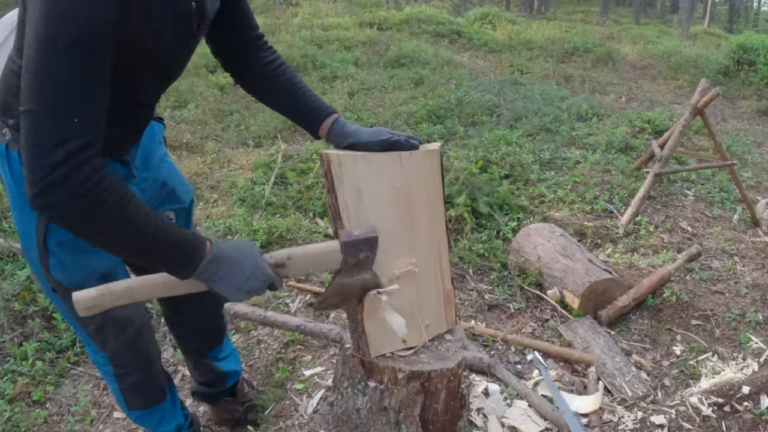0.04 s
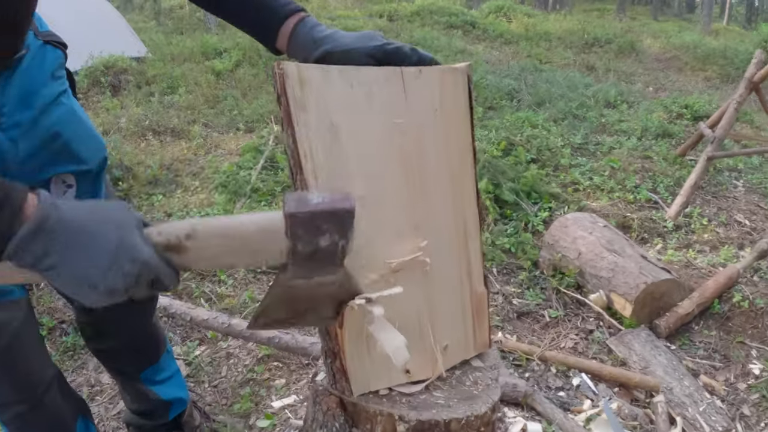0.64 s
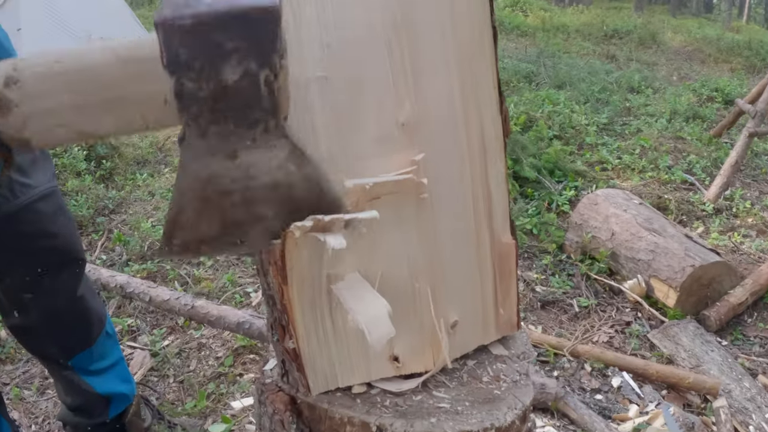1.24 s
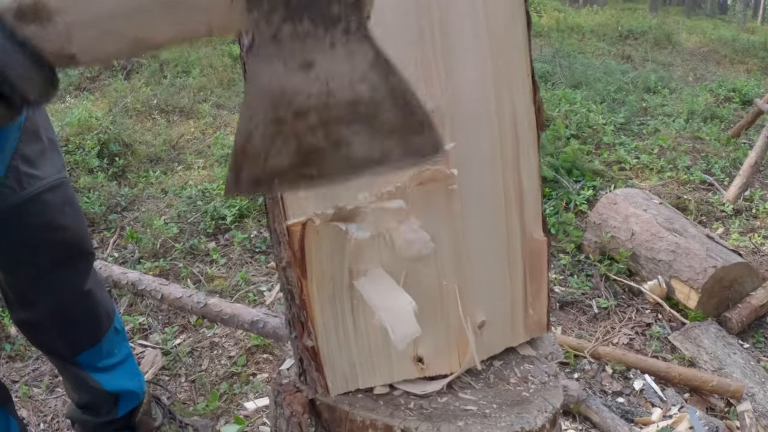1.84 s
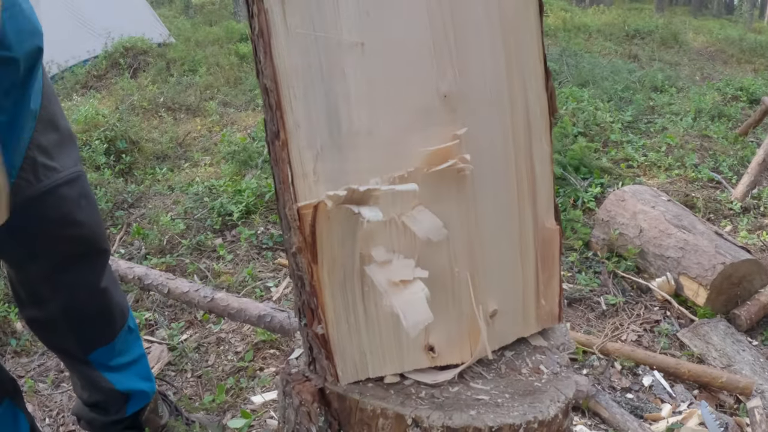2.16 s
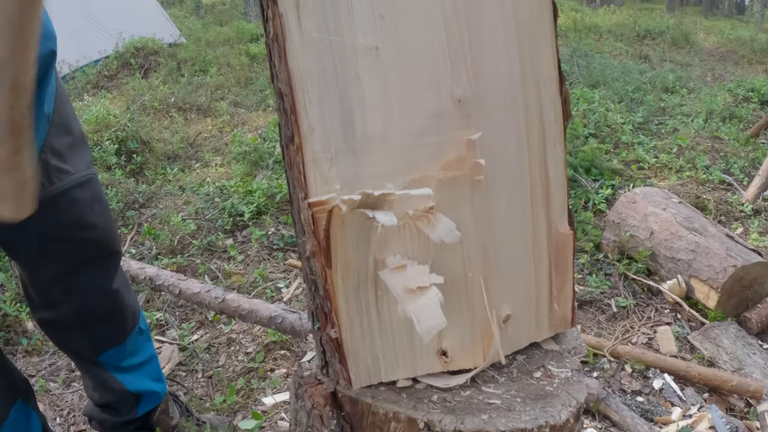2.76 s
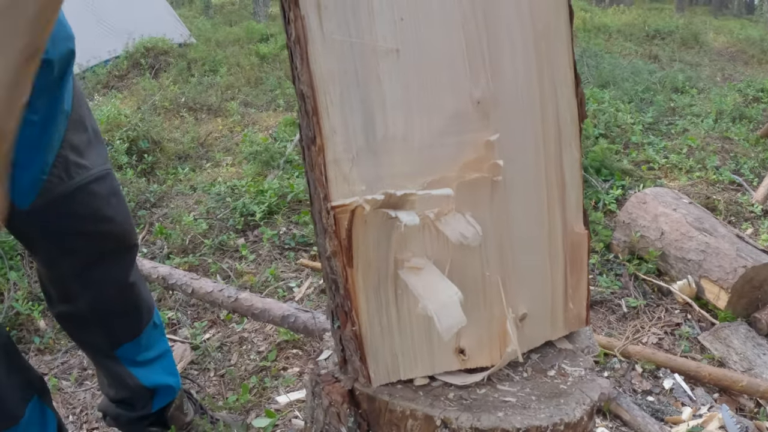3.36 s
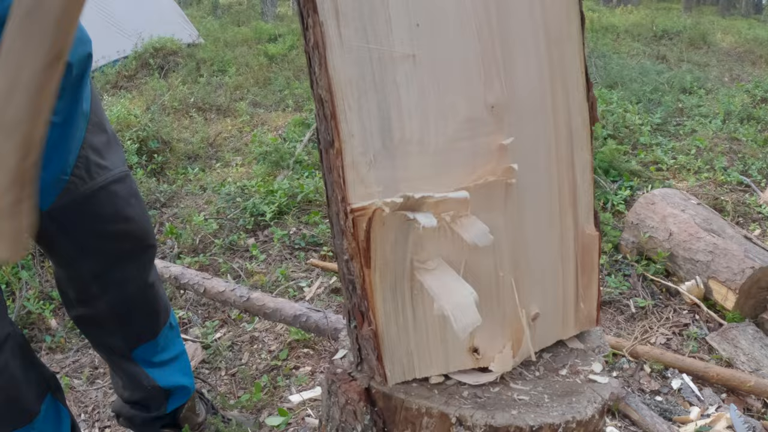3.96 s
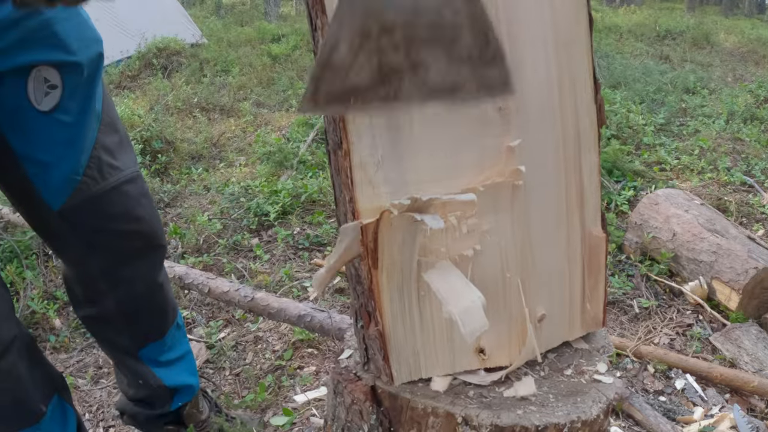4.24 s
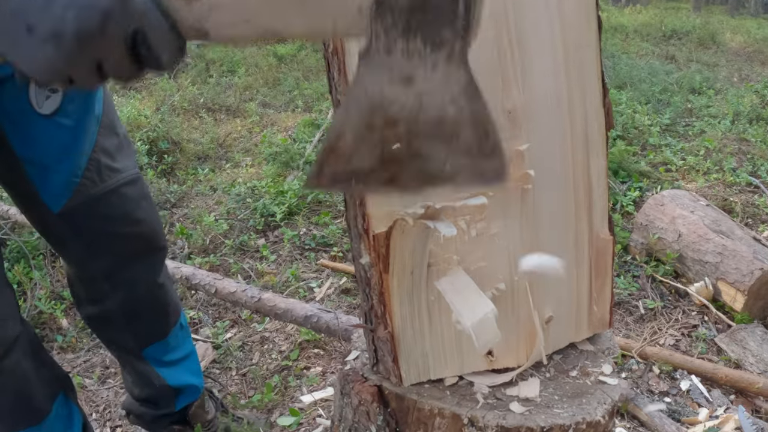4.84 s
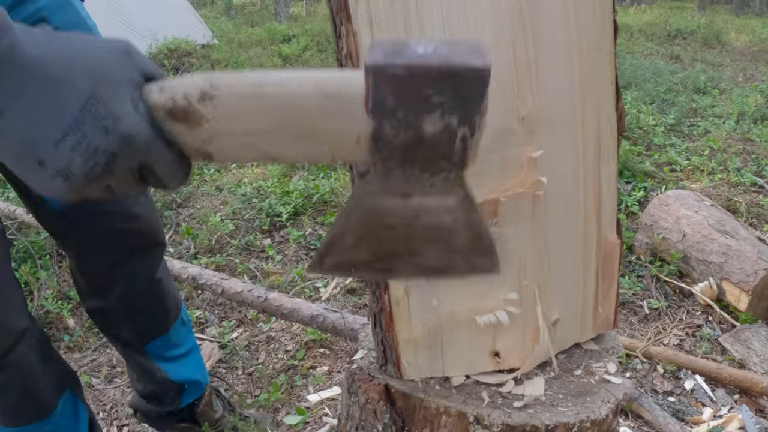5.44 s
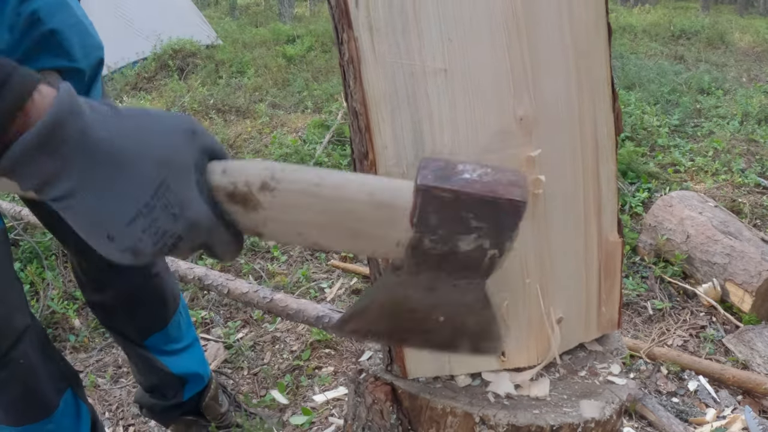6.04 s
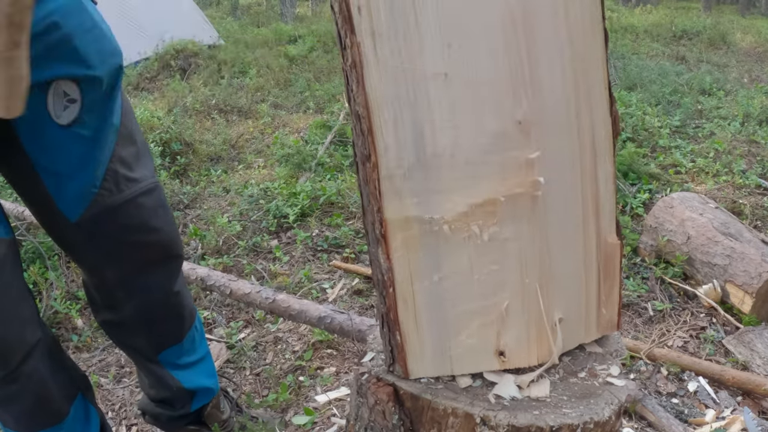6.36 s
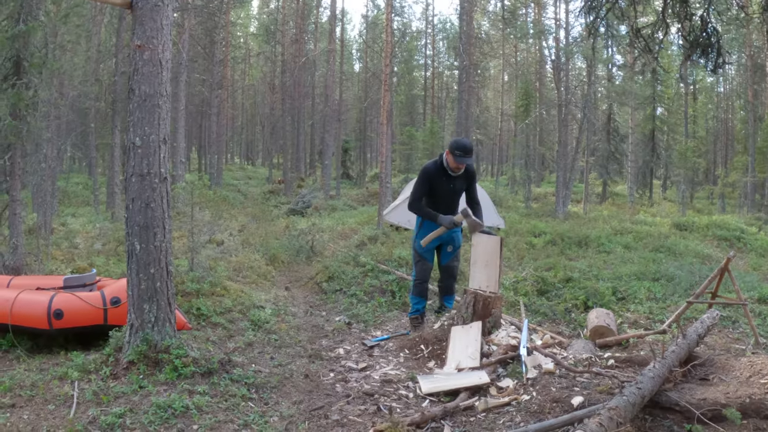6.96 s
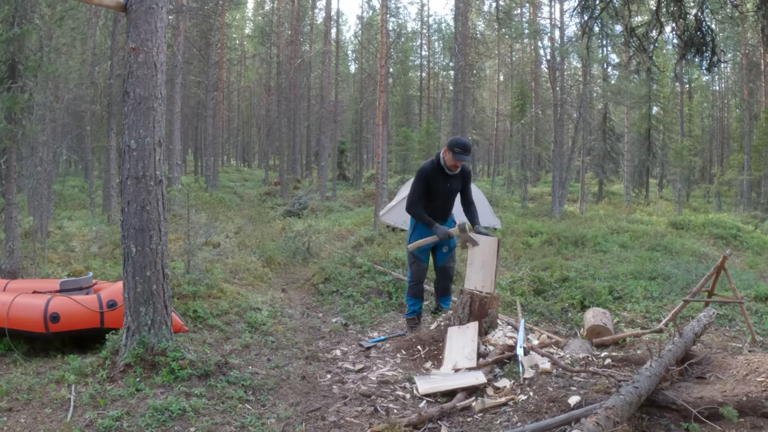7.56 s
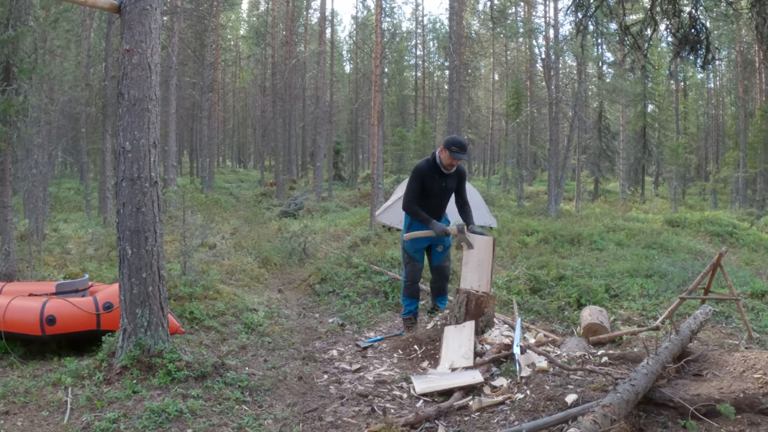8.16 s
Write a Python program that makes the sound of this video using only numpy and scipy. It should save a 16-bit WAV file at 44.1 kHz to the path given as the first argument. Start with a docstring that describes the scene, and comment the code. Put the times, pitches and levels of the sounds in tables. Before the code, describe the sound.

An axe hews a wooden plank on a stump in a quiet forest. After faint rustling and dull microphone handling, the first close chop lands at about 0.6 seconds. Ten more follow steadily, roughly every 0.6 seconds, until 6.7. Each is a sharp woody knock with a crunch of tearing fibres and a slight low thud; the one at 4.1 is mostly a splintering crack. Between strokes, splinters snap, the steel head rings thinly and faintly, clothes rustle and ground litter crackles softly. At 5.6 a split-off slab lands with a short hollow clatter. Around 6.8 the sound dips briefly and the perspective moves farther away. Three hollower chops follow at 7.1, 7.6 and 8.1 seconds, with a short echo among the trunks. A soft forest hush and occasional low puffs of wind on the microphone run underneath.

```python
"""Chopping a plank in a forest

An axe hews a plank on a stump: eleven chops close by, then three from farther off. Each impact excites
the damped modes of plank and stump and tears fibres; pulled free, the steel head rings until the next
chop. Splinters snap, a slab tumbles, and the trunks scatter an echo. Behind the work are the hush of
the forest, crackling litter, rustling clothes, and wind and handling noise at the microphone."""
import sys
import numpy as np
from scipy import signal
from scipy.fft import rfft, irfft
from scipy.io import wavfile
from scipy.ndimage import uniform_filter1d

SR = 44100
rng = np.random.default_rng(int(sys.argv[2]) if len(sys.argv) > 2 else 0)


def dump_mix(stems):
    """Bounce the given channels to the path in sys.argv[1] as a 16-bit WAV at rate SR."""
    frames = np.atleast_2d(stems).T  # one column per channel
    limited = np.clip(frames, -1, 1)  # hard clip at full scale
    pcm = np.round(limited * 32767).astype(np.int16)
    wavfile.write(sys.argv[1], SR, pcm)


N = 362061
TIME, HZ = np.arange(N) / SR, np.fft.rfftfreq(N, 1 / SR)
HIT = np.arange(16384) / SR  # time axis of one impact [s]
HIT_HZ = np.fft.rfftfreq(len(HIT), 1 / SR)
FAR_FROM_S = 6.8  # from here on the work is heard from farther off
NEAR = TIME < FAR_FROM_S


def amp(db):
    """Amplitude ratio: a factor of ten per 20 dB."""
    return 10 ** (np.asarray(db) / 20)

def unit_rms(x):
    """Normalisation to an rms of 1."""
    return x / np.sqrt(np.mean(x ** 2) + 1e-20)

def burst(x, db):
    """Equal energy: the transient carries as much as 20 ms of steady sound at this level."""
    return amp(db) * x / np.sqrt(np.sum(x ** 2) / (SR / 50) + 1e-20)

def read(points, hz):
    """Interpolation on a logarithmic frequency axis."""
    f, value = np.transpose(points)
    return np.interp(np.log(hz + 1), np.log(f + 1), value)

def add(mix, s, sound):
    """Superposition of a sound starting at time s."""
    part = mix[max(round(s * SR), 0):][:len(sound)]
    part += sound[:len(part)]

def colour(x, db):
    """Minimum-phase filtering: the Hilbert transform of the log gain gives a causal response."""
    log_gain = np.log(amp(np.maximum(np.r_[db, db[-2:0:-1]], -100)))
    return irfft(rfft(x) * np.exp(np.conj(signal.hilbert(log_gain)))[:len(db)])

def shaped(x, spectrum):
    """Zero-phase spectral weighting of a long sound, scaled to an rms of 1."""
    return unit_rms(irfft(rfft(x) * amp(read(spectrum, HZ)), N))

def wander(count, size):
    """Low-pass noise of rms 1, correlated over about size points."""
    return unit_rms(uniform_filter1d(uniform_filter1d(rng.standard_normal(count), size), size // 2))

def swells(rows):
    """Incoherent addition: Gaussian swells sum in power to one envelope."""
    return np.sqrt(sum((amp(db) * np.exp(-((TIME - s) / half) ** 2)) ** 2 for s, half, db in rows))

def curve(points):
    """Gain envelope, linear in decibels between points."""
    return amp(np.interp(TIME, *np.transpose(points)))

def grains(envelope, per_s, spread_db):
    """Shot noise: random impulses of very unequal size under an envelope."""
    size = amp(spread_db * np.minimum(rng.exponential(1, len(envelope)), 4))
    sign = rng.choice([-1, 1], len(envelope))
    return envelope * size * sign * (rng.random(len(envelope)) < per_s / SR)

def ring(modes, t=HIT, pitch=1, hold=1, scatter=0):
    """Free vibration as a sum of damped modes; scatter detunes them, as no two blows land alike."""
    hz, db, t60 = np.transpose(modes)[:, :, None]
    hz = hz * pitch * (1 + scatter * rng.standard_normal(hz.shape))
    return (amp(db - 60 * t / np.maximum(t60 * hold, 1e-3)) * np.sin(2 * np.pi * hz * t)).sum(0)

def stereo_noise(side):
    """Partial coherence: two channels share one noise and take another in opposite phase."""
    shared, apart = rng.standard_normal((2, N))
    return np.array([shared + side * apart, shared - side * apart])

def next_chop(s):
    """Onset of the next chop or, after the last, the end of the scene."""
    times = np.array([row[0] for row in STROKES] + [N / SR])
    return times[np.searchsorted(times[:-1], s)]

def build_up(rise_s=0.12):
    """Exponential growth: an envelope that reaches 1 at each chop and drops after it."""
    return np.exp((TIME - next_chop(TIME)) / rise_s)


# Hush by the stump and in the open forest: (frequency [Hz], relative spectral density [dB])
GLADE_SPECTRUM = [(40, 3.5), (100, -7.5), (200, -1), (330, -0.5), (520, 2.5), (800, -2.5), (1300, 0.5),
                  (2200, -8), (4000, -13.5), (8000, -19.5), (15000, -32.5)]
FOREST_SPECTRUM = [(60, -7.5), (150, 6.5), (300, 8), (520, 3), (800, -0.5), (1300, 2.5), (2200, -10.5),
                   (4000, -17), (8000, -16), (15000, -34)]
def air(near_db=-68, far_db=-48, swell_db=-59):
    """Broadband noise: the forest's hush swells toward each close chop and drops after it."""
    near = np.hypot(amp(near_db), amp(swell_db) * build_up())
    near = near * shaped(stereo_noise(0.53), GLADE_SPECTRUM)
    far = amp(far_db) * shaped(stereo_noise(0.48), FOREST_SPECTRUM)
    return np.where(NEAR, near, far)

# Dull rubbing as the microphone is carried up to the plank: (time [s], level [dB])
HANDLING_LEVEL = [(0, -57), (.1, -47.5), (.4, -53.5), (.82, -57), (.93, -47.5), (1.08, -47), (1.22, -61.5),
                  (1.58, -59.5), (1.85, -78)]
# Its spectrum: (frequency [Hz], relative spectral density [dB])
HANDLING_SPECTRUM = [(60, 9), (150, 0.5), (300, -2), (520, 6), (780, -3.5), (1200, 0.5), (2200, -10),
                     (4000, -15.5), (8000, -20.5), (15000, -36.5)]
def handling():
    """Structure-borne noise from handling the microphone, dying away within two seconds."""
    return curve(HANDLING_LEVEL) * shaped(stereo_noise(0.55), HANDLING_SPECTRUM)

# Wind rumble: (frequency [Hz], relative spectral density [dB])
WIND_SPECTRUM = [(15, 10), (30, 10.5), (55, -2), (75, -17), (110, -20), (300, -56.5), (1000, -87)]
# Puffs of wind: (centre time [s], half length [s], level [dB])
PUFFS = [(.3, 0.2, -41.5), (1.06, 0.2, -34.5), (1.54, 0.095, -28.5), (2.86, 0.063, -31),
         (3.42, 0.14, -38.5), (4.08, 0.088, -34.5), (7.05, 0.36, -34.5), (8.15, 0.069, -25)]
def wind(near_db=-53, far_db=-35, swell_db=-38, lump_db=3.0):
    """Turbulent pressure at the microphone: a breeze with puffs, swelling toward each close chop."""
    breeze = np.where(NEAR, np.hypot(amp(near_db), amp(swell_db) * build_up()), amp(far_db))
    rumble = shaped(stereo_noise(0.37) * amp(lump_db * wander(N, size=5000)), WIND_SPECTRUM)
    return np.hypot(breeze, swells(PUFFS)) * rumble * amp([[-1], [1]])  # stronger on the right

# Rustle of litter and of cloth: (frequency [Hz], relative spectral density [dB])
RUSTLE_SPECTRUM = [(300, -17), (1000, 8), (2000, 6.5), (3200, 3), (5000, 6.5), (8000, 0.5), (11000, -4.5),
                   (13000, -17), (16000, -37.5)]
def litter(level_db=-68, pitch_hz=5500, twigs=16):
    """Impulse-driven resonators: dry twigs crackle in flurries, each at its own pitch, only close by."""
    flurries = amp(6 * wander(N, size=4000)) * NEAR
    ticks, t = np.zeros(N), HIT[:256]
    for hz in pitch_hz * np.geomspace(0.5, 1.7, twigs):
        fracture = rng.standard_normal(len(t)) * np.exp(-t / 0.001)
        resonance = np.exp(-t * hz / 1.5) * np.sin(2 * np.pi * hz * t)
        snap = unit_rms(signal.fftconvolve(fracture, resonance))
        ticks += signal.oaconvolve(grains(flurries, per_s=5, spread_db=3), snap)[:N]
    return amp(level_db) * shaped(ticks, RUSTLE_SPECTRUM)

# Sleeves and trousers rub as the body shifts: (centre time [s], half length [s], relative level [dB])
BODY_SHIFTS = [(.01, 0.013, -37), (.2, 0.036, -39.5), (.29, 0.037, -37), (.375, 0.026, -34.5),
               (.48, 0.053, -49.5), (.73, 0.076, -46.5), (.98, 0.046, -53), (1.62, 0.15, -64.5),
               (3.03, 0.043, -50), (3.63, 0.034, -55), (5.3, 0.054, -53.5), (5.77, 0.041, -44),
               (5.88, 0.075, -48.5), (6.37, 0.096, -49.5)]
def clothes(gain_db=-4.5, lift_db=-62, lift_lead_s=0.18, lift_half_s=0.062, near_db=-65, far_db=-64):
    """Friction noise in uneven clumps: always a little, more at body shifts and close axe lifts."""
    lifts = [(s - lift_lead_s, lift_half_s, lift_db) for s, *_ in STROKES if s < FAR_FROM_S]
    motion = np.hypot(swells(list(BODY_SHIFTS) + lifts), amp(np.where(NEAR, near_db, far_db)))
    clumps = amp(5 * wander(N, size=900))
    return amp(gain_db) * motion * shaped(grains(clumps, per_s=3000, spread_db=4.5), RUSTLE_SPECTRUM)

def lulls(depth_db=7, recovery_s=0.15):
    """Amplitude modulation: the background sinks for a moment after each chop."""
    sunk_db = np.zeros(N)
    for s, *_ in STROKES:
        add(sunk_db, s, depth_db * np.clip(1 - HIT / recovery_s, 0, 1))
    return amp(-sunk_db)

# Reverberation among the trunks: (frequency [Hz], decay time T60 [s])
FOREST_DECAY = [(100, 0.63), (600, 0.49), (2000, 0.43), (6000, 0.41), (14000, 0.6)]
def trunks(x, echoes_per_s=1500, gap_s=0.006):
    """Scattering: sparse reflections from the trees form a tail whose decay depends on frequency."""
    taps = rng.standard_normal((2, SR)) * (rng.random((2, SR)) < echoes_per_s / SR)
    taps[:, :round(gap_s * SR)] = 0
    hz, t, spectra = signal.stft(taps + 0.5 * taps[::-1], SR, nperseg=256)
    tone_db = read([(100, -11), (600, -8.5), (2000, -1.5), (6000, -5.5), (14000, -21)], hz)[:, None]
    decay_db = 60 * t / read(FOREST_DECAY, hz)[:, None]
    tail = signal.istft(spectra * amp(tone_db - decay_db), SR, nperseg=256)[1]
    return signal.fftconvolve(x[None], tail / np.linalg.norm(tail[0]), axes=1)[:, :N]

# Level difference between the microphone ports: (frequency [Hz], left minus right [dB])
LEVEL_DIFFERENCE = [(100, -.7), (380, -1.4), (1300, -2.4), (2400, -1.4), (9000, -1.5), (14000, .3)]
# Phase difference between them: (frequency [Hz], lead of the left [rad])
PHASE_DIFFERENCE = [(0, 0), (500, -.25), (1500, -.4), (2800, -.7), (4000, -.7), (7000, -.5), (14000, -.6)]
def ports(x):
    """Spaced receivers: one source reaches the two ports slightly apart in level and phase."""
    half = amp(read(LEVEL_DIFFERENCE, HZ) / 2) * np.exp(0.5j * read(PHASE_DIFFERENCE, HZ))
    return irfft(rfft(x) * np.array([half, 1 / half]), N)

def from_afar(x, thin_db=5.0, thin_hz=260, woody_db=6.5, woody_hz=1000):
    """Spectral colouration: from farther off the chops lose their low body and sound woodier."""
    peak_db = woody_db * np.exp(-(2 * np.log2((HZ + 1) / woody_hz)) ** 2)
    trough_db = thin_db * np.exp(-(1.12 * np.log2((HZ + 1) / thin_hz)) ** 2)
    return irfft(rfft(x) * amp(peak_db - trough_db), N)

# Splinters snap and chips land: (time [s], level [dB], centre frequency [Hz], length [s])
CHIP_SNAPS = [(0.426, -46, 1230, 0.025), (0.578, -36, 5600, 0.0033), (.9685, -40, 5560, 0.0072),
              (1.0574, -48.5, 5840, 0.00099), (1.453, -47.5, 4630, 0.0039), (2.0553, -53, 4040, 0.01),
              (2.134, -55.5, 7040, 0.0088), (2.333, -33.5, 4830, 0.002), (2.405, -53, 4800, 0.00045),
              (2.448, -40, 4160, 0.004), (2.457, -54, 2250, 0.0091), (2.691, -49.5, 4050, 0.0085),
              (3.0465, -49, 2090, 0.006), (3.136, -61, 1950, .0022), (4.1094, -28, 5560, .001),
              (4.248, -42, 4100, 0.028), (4.496, -50.5, 2780, 0.014), (4.59, -44, 3300, 0.0034),
              (4.7273, -34, 4630, 0.0012), (5.1065, -58, 5330, 0.0047), (5.296, -50.5, 4550, 0.0098),
              (5.618, -47, 5300, 0.0035), (5.632, -50, 3380, 0.015), (5.711, -50, 2360, 0.0091),
              (5.729, -47.5, 3520, 0.0041), (6.015, -33, 4870, 0.00067), (6.3253, -51, 5400, 0.019),
              (6.397, -49.5, 4630, 0.0026), (6.969, -45.5, 6200, 0.014), (7.3114, -45, 2300, 0.0063)]
def chips(low_hz=1000, top_hz=11500, skirt_db=5.5, ripple_db=3):
    """Brittle fracture: each short clump of cracks is filtered by the splinter's own resonances."""
    out = np.zeros(N)
    band_db = -10 * np.log10((1 + (HIT_HZ / top_hz) ** 16) * (1 + (low_hz / (HIT_HZ + 1)) ** 6))
    for s, db, hz, length in CHIP_SNAPS:
        clump = grains(np.exp(-(HIT / length) ** 2), per_s=5000, spread_db=6)
        clump[0] += 4  # the first break
        tone_db = band_db - skirt_db * np.log2((HIT_HZ + 400) / hz) ** 2
        resonances_db = ripple_db * wander(len(HIT_HZ), size=130)
        add(out, s, burst(colour(clump, tone_db + resonances_db), db))
    return out

# A split-off slab lands and tumbles: (time [s], level [dB])
SLAB_LANDINGS = [(5.6196, -27), (5.715, -50), (5.732, -48)]
# Its modes: (frequency [Hz], relative level [dB], decay time T60 [s])
SLAB_MODES = [(410, -1, 0.051), (542, 14, 0.0066), (869, -2, 0.083), (940, 9.5, 0.014), (1110, -9, 0.014),
              (1403, -14.5, 0.013), (2660, -21.5, 0.017)]
def slab(rattle_db=-8, rattle_s=0.0058, low_hz=380):
    """Convolution of rattling contacts with the light slab's modes gives a hollow clatter."""
    out = np.zeros(N)
    low_cut_db = -10 * np.log10(1 + (low_hz / (HIT_HZ + 1)) ** 4)
    for s, db in SLAB_LANDINGS:
        contact = grains(amp(rattle_db) * np.exp(-HIT / rattle_s), per_s=1600, spread_db=3.2)
        contact[0] = 1
        clatter = signal.fftconvolve(contact, ring(SLAB_MODES))[:len(HIT)]
        add(out, s, burst(colour(clatter, low_cut_db), db))
    return out

# Modes of the free steel head: (frequency [Hz], relative level [dB], decay time T60 [s])
HEAD_MODES = [(2857, -10.5, 10), (4180, -6, .06), (5130, -13.5, 0.1), (7830, -19, 0.16)]
# The head comes free of the wood: (time [s], relative level [dB])
HEAD_RELEASES = [(.19, -43), (.68, -43), (1.85, -65.5), (2.449, -42), (3.05, -59), (3.638, -51.5),
                 (4.865, -57), (6.12, -51)]
def axe_head(nearest_m=0.46, travel_m=0.21, fade_s=0.0063, waver_db=2.5):
    """Doppler shift and spherical spreading: the ringing head sounds lower and fainter as it recedes."""
    out = np.zeros(N)
    for start, db in HEAD_RELEASES:
        t = np.arange(0, next_chop(start) - start, 1 / SR)
        lift_m = travel_m * np.exp(-((t / t[-1] - 0.7) / 0.28) ** 2)  # farthest at 70 % of the swing
        heard = ring(HEAD_MODES, t - lift_m / 343) * nearest_m / (nearest_m + lift_m)
        gate = np.clip(np.minimum(t, t[-1] - t) / fade_s, 0, 1)  # the wood stops it at the next chop
        add(out, start, np.sqrt(2) * amp(db) * heard * gate)
    return out * amp(waver_db * wander(N, size=3500))

def lead_in(db, lead_s, rise_s=0.011):
    """Exponential growth: a brief dull swell of noise leads into each blow."""
    envelope = np.exp(np.minimum(HIT - lead_s, 0) / rise_s) * np.minimum(3 * HIT / lead_s, 1)
    noise = grains(envelope * (HIT < lead_s), per_s=9800, spread_db=1.2)
    spectrum = [(100, -15), (350, 0), (600, 1.5), (780, -12), (1000, 1), (1500, -15), (4000, -21),
                (8500, -34.5), (15000, -46)]
    return burst(colour(noise, read(spectrum, HIT_HZ)), db)

# Parting wood fibres: (frequency [Hz], relative spectral density [dB])
TEAR_SPECTRUM = [(200, -6), (500, 6.5), (780, 1.5), (1100, 2.5), (2000, 2.5), (3000, -2.5), (4400, -3),
                 (7000, -10), (10500, -20), (13000, -29), (16000, -42.5)]
def tearing(db, length, tilt_db, bite_db=7, bite_s=0.0047, fade_s=0.0039, faint_db=-27, faint_s=0.0051):
    """Acoustic emission: the edge bites hard, fibres part as it sinks in, a few more after it stops."""
    bite = amp(bite_db) * np.exp(-HIT / bite_s) + amp(faint_db) * np.exp(-HIT / faint_s)
    sinking = np.exp(-np.maximum(HIT - length, 0) / fade_s)
    resonances_db = 2 * wander(len(HIT_HZ), size=90)  # every splinter has its own
    tone_db = read(TEAR_SPECTRUM, HIT_HZ) + tilt_db * np.log2((HIT_HZ + 300) / 2500) + resonances_db
    return burst(colour(grains(bite + sinking, per_s=7000, spread_db=2.8), tone_db), db)

# Modes of the stump on soft ground: (frequency [Hz], relative level [dB], nominal T60 [s])
STUMP_MODES = [(79, -9, 0.18), (117.7, -4, .17), (165.7, -12, 0.16), (237, -6.5, 0.091)]
def stump(db, rise_s=0.016):
    """Coupled vibration: the stump's low modes build up slowly in answer to the blow."""
    onset = 1 - np.exp(-(HIT / rise_s) ** 2)
    return burst(ring(STUMP_MODES, hold=0.95, scatter=0.05) * onset, db)

# Modes of the plank: (frequency [Hz], relative level [dB], decay time T60 [s])
PLANK_MODES = [(183, -6.5, 0.096), (259, 0, 0.022), (351.4, 0.5, 0.042), (462.6, 5, 0.024),
               (554.5, 1, 0.042), (643.7, -6, 0.073), (971, -8, 0.043), (1116, 1.5, 0.019),
               (1413, -2.5, 0.024), (1780, 3, 0.0074), (2149, -0.5, .02), (2900, 4.5, 0.0045),
               (3076, -0.5, 0.034), (4310, -2, 0.038), (5000, -11, 0.0053), (5630, -5.5, 0.023),
               (7900, -2.5, 0.023)]
def knock(db, hard_hz, pitch, hollow_db, clack_db=0, spread_s=0.001343, radiate_hz=175):
    """Modal excitation: the point of impact sets how strongly the hollow and clack modes speak."""
    hz, mode_db, t60 = np.transpose(PLANK_MODES)
    mode_db = mode_db + hollow_db * np.exp(-((hz - 625) / 70) ** 2)
    mode_db += clack_db * np.exp(-((hz - 2000) / 550) ** 2)
    wood = ring(np.transpose([hz, mode_db, t60]), pitch=pitch, scatter=0.016)
    contact_loss = 1 + (HIT_HZ / hard_hz) ** 2  # a soft contact loses the treble
    radiation_loss = 1 + (radiate_hz / (HIT_HZ + 1)) ** 4  # a narrow board radiates little bass
    wood = colour(wood, -10 * np.log10(contact_loss * radiation_loss))
    delay = spread_s * np.sqrt(400 / (HIT_HZ + 100))  # dispersion: low bending waves travel slower
    phase = 2 * np.pi * np.cumsum(delay - delay[-1]) * HIT_HZ[1]
    return burst(irfft(rfft(wood) * np.exp(-1j * phase)), db)

# Axe strokes, levels relative: (time [s], blow level [dB], contact cutoff [Hz], plank pitch [ratio],
# hollow boost [dB], clack boost [dB], tearing level [dB], tearing length [s],
# tearing tilt [dB/octave], stump level [dB])
STROKES = [(0.5536, -18.5, 2300, 0.95, 8.5, 7.5, -28, 0.036, -2, -28.5),
           (1.1605, -17.5, 1520, .93, 9, 9, -28.5, .013, 3, -33.5),
           (1.748, -18, 1880, 0.97, 3, 11.5, -29.5, .011, 3, -33.5),
           (2.3219, -18.5, 1530, 0.96, 2.5, 12.5, -28, 0.018, 2, -35),
           (2.9122, -21, 3400, 1, 3, 13.5, -21.5, 0.0055, 1, -26.5),
           (3.498, -20, 1850, 0.93, -1, 6.5, -19.5, 0.0073, -2, -25),
           (4.1005, -32.5, 3000, 1, 3.5, 5, -18.5, 0.011, 1, -36),
           (4.732, -21.5, 1590, 0.9, -4.5, 5.5, -21.5, 0.0023, -.5, -35),
           (5.365, -23, 2980, 0.82, -2.5, 0, -20, 0.0082, 0, -37),
           (6.006, -18, 1830, 0.99, -10, 8.5, -23.5, 0.015, 3.5, -26),
           (6.6917, -19, 1360, 0.98, 1.5, 3, -24.5, .014, 1.5, -37.5),
           (7.07, -10.5, 1200, .96, 19.5, 7.5, -15.5, 0.017, 5, -10.5),
           (7.6062, -4.5, 1930, 0.96, 19.5, 5, -17.5, 0.02, 4, -14.5),
           (8.1222, -5, 1210, 0.94, 16.5, -17, -14.5, .015, 2, -19)]
# Duller knocks, mostly just before or after a chop; one rings at the start: (time [s],
# relative level [dB], contact cutoff [Hz], plank pitch [ratio], hollow boost [dB])
DULL_KNOCKS = [(.001, -39.5, 720, 1.0, 23), (0.296, -42, 714, 1, 5), (0.5854, -20, 370, 0.93, 11),
               (2.3132, -27, 1210, 0.94, 11), (2.904, -27.5, 2550, 0.94, -8), (3.49, -25.5, 838, 1, 2),
               (3.5063, -22.5, 513, 0.92, 1), (4.1087, -23, 303, 0.93, 1.5), (4.724, -24, 649, 0.94, 9.5),
               (4.867, -55, 600, 0.72, -17), (5.3594, -24.5, 900, 0.93, 1), (5.369, -25, 2020, 0.82, 1),
               (6.025, -24.5, 205.2, 0.49, 4), (6.115, -42, 695, 0.78, 6)]
def chops(lead_s=0.03, near_lead_db=-29.5, far_lead_db=-31, far_stump_lag_s=0.006):
    """Impact sound: knock, tearing and stump superpose after a swell of noise; duller knocks join in."""
    out = np.zeros(N)
    for s, db, hard_hz, pitch, hollow_db, clack_db, tear_db, length, tilt_db, stump_db in STROKES:
        far = s > FAR_FROM_S
        add(out, s + far * far_stump_lag_s, stump(stump_db))
        add(out, s, knock(db, hard_hz, pitch, hollow_db, clack_db) + tearing(tear_db, length, tilt_db))
        add(out, s - lead_s, lead_in(far_lead_db if far else near_lead_db, lead_s))
    for s, *settings in DULL_KNOCKS:
        add(out, s, knock(*settings))
    return out

# Overall gain, which dips briefly and settles lower for the far chops: (time [s], gain [dB])
OVERALL_GAIN = [(6.75, 9), (6.765, -20), (6.82, -35), (6.85, -7.5)]
def scene(chop_db=-3.5, far_db=2.67, near_echo_db=-43, far_echo_db=-20):
    """Direct sound, echo and background superpose; the echo's share is greater at a distance."""
    work = amp(chop_db) * chops() + chips() + slab()
    near, far = work * NEAR, amp(far_db) * from_afar(work * ~NEAR)
    echo = trunks(amp(near_echo_db) * near + amp(far_echo_db) * far)
    background = (ports(clothes() + litter()) + air() + handling() + wind()) * lulls()
    return (ports(near + far + axe_head()) + echo + background) * curve(OVERALL_GAIN)

def record(dry, ceiling=0.86, edge_hz=16400):
    """Soft saturation rounds the peaks; a low-pass filter then limits the band."""
    rounded = dry / (1 + (dry / ceiling) ** 6) ** (1 / 6)
    low_pass = signal.firwin(511, edge_hz, window=("kaiser", 9), fs=SR)
    return signal.oaconvolve(rounded, low_pass[None], "same")


dry = scene()
out = record(dry)
dump_mix(out)
```